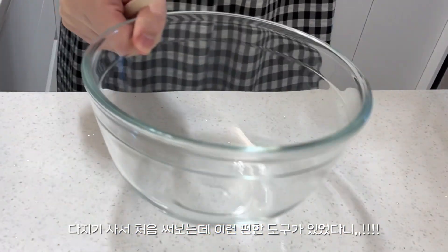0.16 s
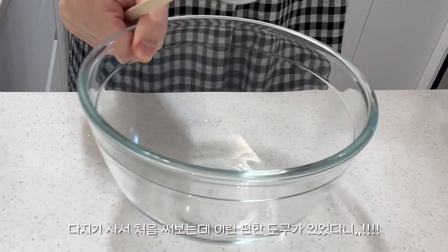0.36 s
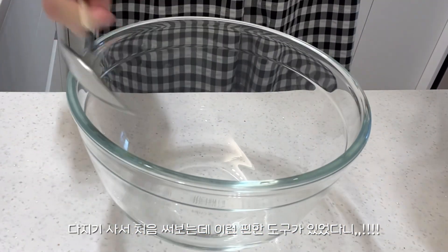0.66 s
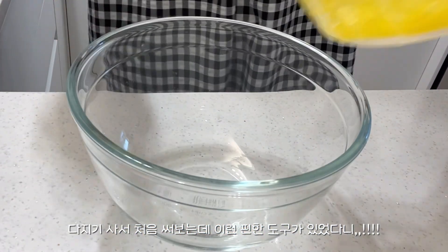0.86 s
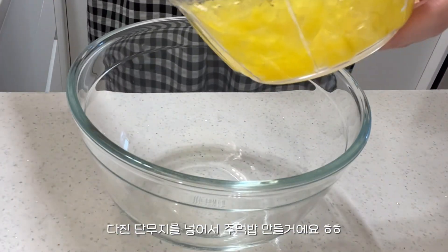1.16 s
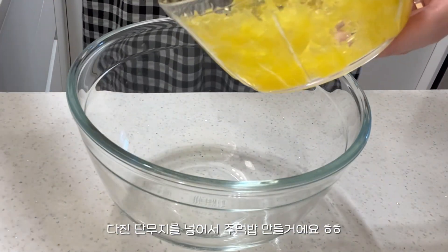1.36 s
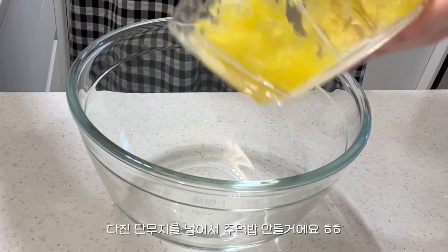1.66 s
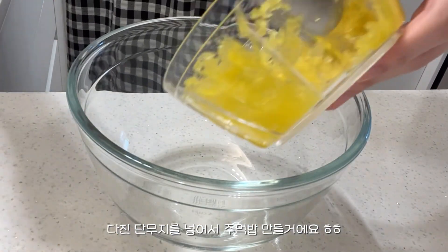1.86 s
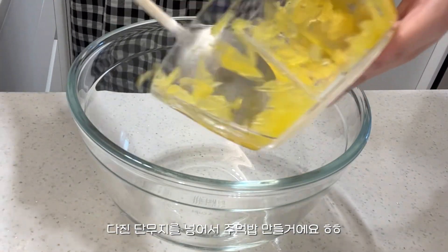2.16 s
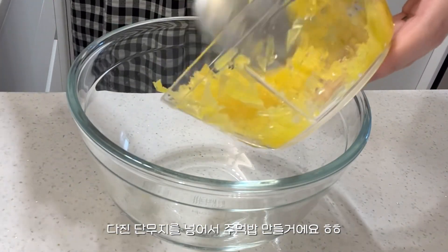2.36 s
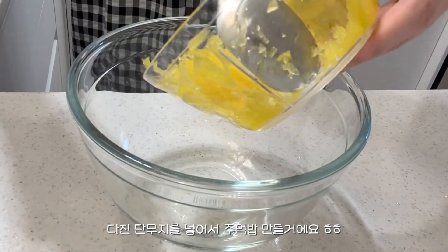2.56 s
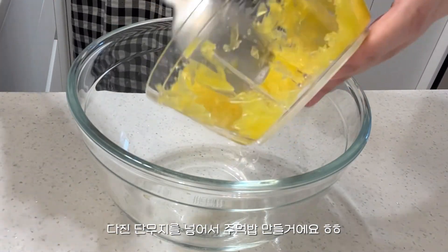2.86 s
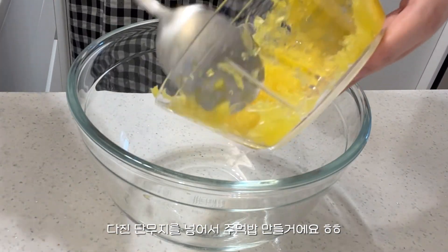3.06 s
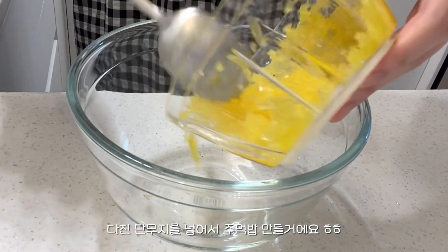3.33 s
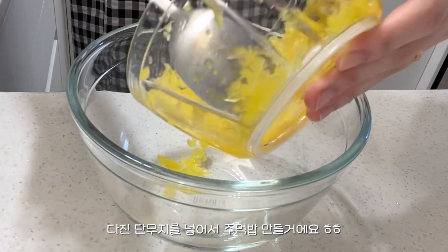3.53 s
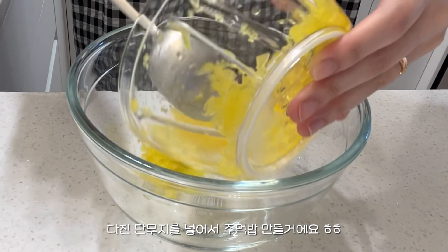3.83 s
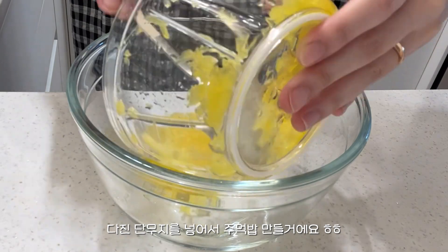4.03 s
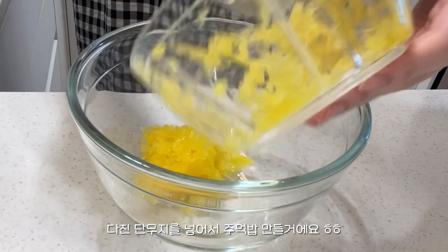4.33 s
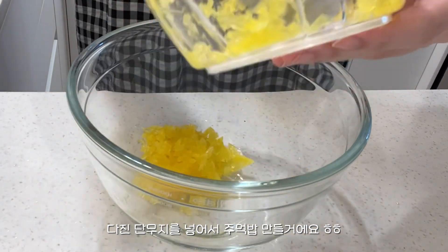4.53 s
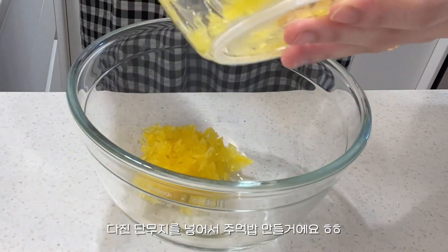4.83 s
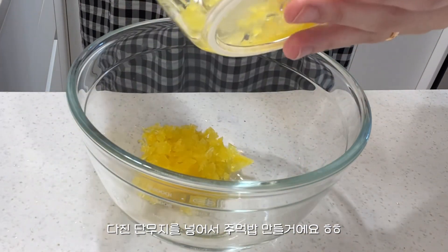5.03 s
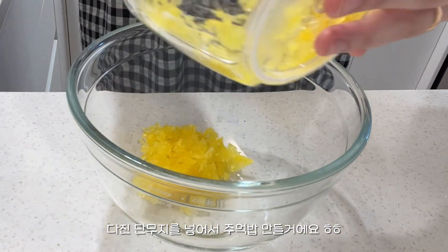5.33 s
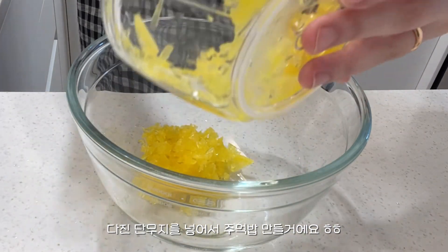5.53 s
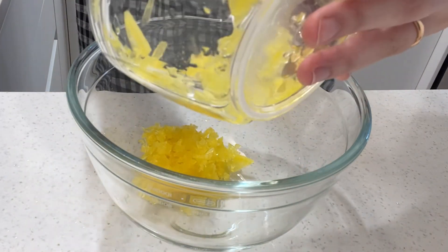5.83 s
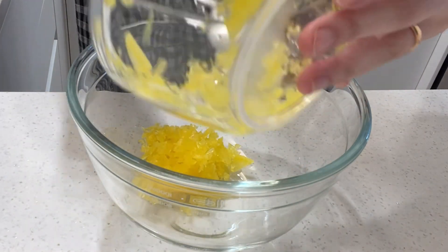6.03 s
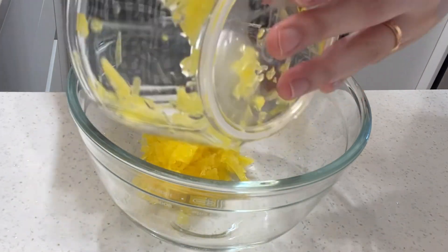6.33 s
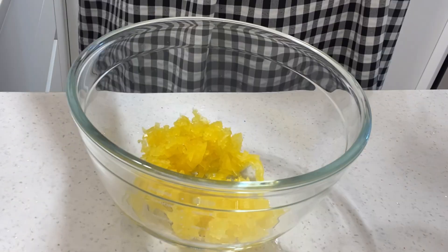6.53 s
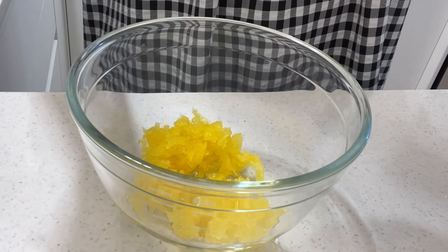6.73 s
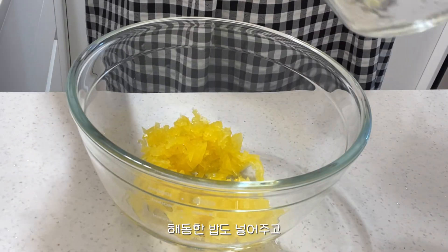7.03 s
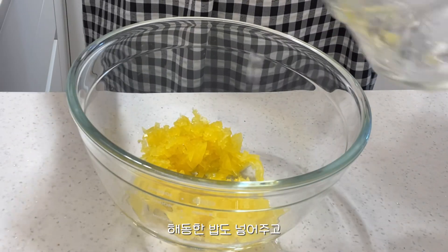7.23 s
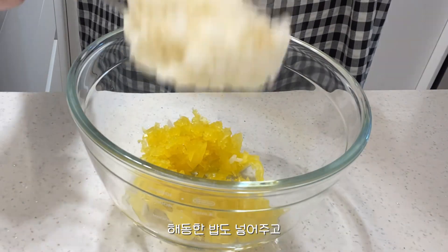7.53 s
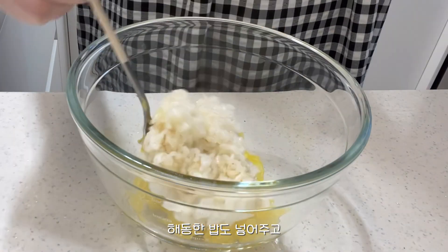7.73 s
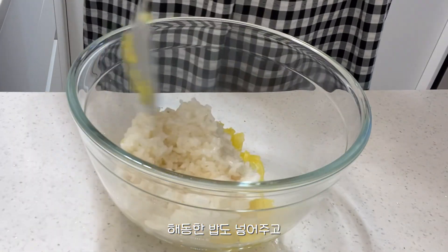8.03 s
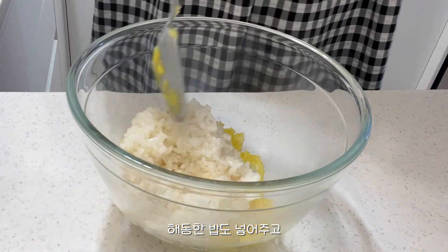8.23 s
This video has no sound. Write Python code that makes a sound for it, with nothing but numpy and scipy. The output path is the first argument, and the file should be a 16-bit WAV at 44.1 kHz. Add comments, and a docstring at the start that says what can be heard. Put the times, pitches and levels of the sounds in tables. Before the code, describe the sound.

Close stereo pickup of kitchen handling: low thuds as a heavy glass bowl lands, a short clear clink, then a pause. Spoon blows on a hand-held plastic container come singly and in tight clusters, bright cracks over a hollow pock around one kilohertz, with short wet rasps. After the final three taps with slight spoon ringing, only soft low hum and tiny ticks of rice remain. Short room reflections.

```python
"""A steel spoon knocks and scrapes a plastic cup of chopped pickle over a glass bowl: each blow is
noise bursts plus decaying wall and hollow modes, each scrape a filtered train of random slips.
The bowl is first set on a kitchen counter, whose slab booms; glass and spoon ring as modal sums.
A small hard room answers with decaying noise, over a low appliance hum of shaped noise;
a pair of close microphone ports hears it all, differing in phase and level."""
import sys
import numpy as np
from scipy import signal
from scipy.fft import rfft, irfft, next_fast_len
from scipy.io import wavfile
from scipy.ndimage import uniform_filter1d

SR = 44100
rng = np.random.default_rng(int(sys.argv[2]) if len(sys.argv) > 2 else 0)


def materialize(psi):
    """Save the field psi as 16-bit PCM at rate SR to the path in sys.argv[1].

    A 1-D psi becomes a single channel; in a 2-D psi each row is a channel.
    """
    bounded = np.clip(np.atleast_2d(psi).T, -1, 1)
    quanta = np.round(bounded * 32767).astype(np.int16)
    wavfile.write(sys.argv[1], SR, quanta)


N = 369999  # samples

# All levels are relative: room, ports and microphone filter follow.
# Appliance hum spectrum: pitch_hz [Hz], density_db [dB per Hz]
HUM_SPECTRUM = [(15, -30), (25, -13), (54, 3.5), (81, -2.5), (125, -8), (254, -12), (415, -22),
                (559, -17.5), (889, -19.5), (1030, -21.5), (1400, -32), (2200, -40.5), (5530, -48),
                (9280, -50), (11500, -56), (16900, -59)]
# Hum likeness of the two ports: pitch_hz [Hz], correlation [-1 to 1]
HUM_LIKENESS = [(60, 0.49), (170, 0.28), (345, 0.32), (520, -0.21), (1300, -0.44), (1700, -0.15),
                (6500, -0.18), (8600, .8), (12000, 0), (15000, .5)]
# Hum balance: pitch_hz [Hz], left_minus_right_db [dB]
HUM_BALANCE = [(60, 0), (170, -4), (345, -5), (700, -2), (1200, -2), (1600, 0)]
HUM_END_DB, HUM_EASES_DB = -66.5, 3.5  # rms level at the end; extra at the start, easing evenly

# Jolts that make the counter slab boom: start_s [s], level_db [dB]
JOLTS = [(0.071, -53), (0.196, -32.5), (0.319, -45), (0.468, -25.5), (0.601, -49.5), (0.73, -51),
         (1.579, -52.5), (2.142, -55.5), (2.679, -43.5), (3.118, -54.5), (3.52, -54), (4.171, -40.5),
         (4.51, -46), (5.311, -46), (5.701, -55.5), (6.33, -58)]
# Modes of the counter slab: pitch_hz [Hz], level_db [dB], t60_s [s]
COUNTER_MODES = [(60, -1.5, 0.27), (77, -2, 0.16), (132, -7, .15), (178, -8.5, 0.13), (237, -10.5, 0.16),
                 (366, -14.5, 0.29)]
# The bowl's foot meets the counter: start_s [s], knock_db [dB], clack_db [dB]
SETDOWNS = [(.197, -31.5, -64), (.320, -55.5, -62), (0.470, -27.5, -39)]

# Blows on the glass: spot [name], start_s [s], ring_db [dB], contact_db [dB]
GLASS_BLOWS = [("rim", .532, -32, -38.5), ("flank", 4.143, -41, -60), ("foot", 4.178, -45, -58)]
# Modes of the glass: pitch_hz [Hz], t60_s [s], then rim_db, flank_db, foot_db [dB] by spot struck
GLASS_MODES = [(657, .7, -24, -15, -16), (1646, 1.2, -35, -30, -30), (1651, .3, -35, -40, -40),
               (1663, .75, -48, -14, 0), (1970, .08, -14, -25, -25), (2982, .5, -24, -4, -1),
               (2988, .42, 0, -30, -30), (3500, .06, -14, -30, -30), (3817, .12, -18, -25, -25),
               (4560, .1, -14, -20, -30), (4640, .22, -17, -6, -12), (4760, .08, -10, -20, -30),
               (6638, .16, -25, -20, -34), (6977, .15, -24, -30, -30), (8113, .12, -28, -24, -36),
               (8930, .09, -20, -3, -34), (9480, .09, -26, -14, -36), (10400, .12, -32, -22, -38),
               (13100, .08, -34, -30, -44), (14300, .08, -34, -30, -44)]
# Blows that leave the spoon ringing: spot [name], start_s [s], ring_db [dB], contact_db [dB]
SPOON_BLOWS = [("edge", 6.439, -54.5, -62), ("back", 6.567, -38, -60), ("tip", 6.686, -43, -61)]
# Modes of the spoon: pitch_hz [Hz], t60_s [s], then edge_db, back_db, tip_db [dB] by spot struck
SPOON_MODES = [(1950, .2, 5, -20, -12), (2853, .17, 0, -14, -9), (4124, .23, -14, -16, 0),
               (4440, .13, -16, 0, -20), (5286, .17, -1, -12, -10), (6735, .25, -8, -3, -4),
               (7000, .25, -1, -14, -16), (7257, .2, -5, -12, -8), (7560, .13, -16, 0, -16),
               (8947, .2, -10, -10, -10), (9400, .18, -6, -14, -14), (11200, .16, -8, -18, -20)]

# Spoon on cup: landing_s [s], hollow_db [dB], hollow_pitch_hz [Hz], hollow_t60_s [s],
# load_slap_db [dB], wall_flex_db [dB], crack_db [dB], steel_edge_tick_db [dB]
KNOCKS = [(1.348, -34.5, 1048, .046, -67.5, -52.5, -45.5, -57.5),
          (1.493, -19.5, 1128, .047, -46, -34.5, -31, -30.5),
          (1.566, -56, 930, .084, -38.5, -54, -36, -41.5), (1.908, -51, 930, .029, -51, -82, -80, -83),
          (1.977, -52, 900, .046, -39, -66, -50.5, -55), (2.139, -58.5, 1030, .08, -45, -73, -59.5, -69),
          (2.446, -58, 940, .08, -48, -90, -81, -87), (2.526, -35, 917, .072, -55, -46, -40.5, -45),
          (2.572, -13.5, 1085, .056, -32, -23.5, -28, -35), (2.672, -18, 900, .027, -41, -25, -22, -24),
          (2.991, -30, 1007, .071, -57, -44.5, -45.5, -56),
          (3.413, -64, 1002, .067, -76.5, -67.5, -69.5, -83),
          (3.459, -23, 1053, .08, -54, -28.5, -34.5, -29), (3.509, -24, 1120, .08, -29, -28.5, -24, -29.5),
          (3.519, -23, 1064, .08, -40.5, -23.5, -34.5, -33), (3.659, -56, 986, 0.083, -57, -59, -59.5, -63),
          (4.025, -15.5, 1042, .045, -45, -26, -28, -33), (4.141, -24, 1150, .073, -47, -51, -39, -60),
          (4.148, -25, 1048, .037, -34, -38.5, -37.5, -61), (4.166, -33, 1153, .12, -54, -47, -61, -58),
          (4.515, -16.5, 932, .09, -31, -28, -22.5, -28.5), (4.613, -19, 951, .039, -35, -41.5, -22.5, -29),
          (4.69, -25, 971, .058, -44, -29, -24, -34), (4.786, -50, 1112, .032, -56, -50, -41, -54),
          (4.802, -17.5, 984, .1, -40, -27, -24, -27), (4.813, -20, 1000, .06, -46, -49, -49, -51),
          (5.164, -24.5, 1002, .072, -37, -26.5, -23, -27), (5.303, -17, 1011, .13, -38.5, -27, -17, -22),
          (5.558, -44, 1005, .08, -60, -56, -41.5, -55), (5.631, -20.5, 1042, .063, -33.5, -29.5, -23, -32),
          (5.697, -18.5, 1234, .08, -47, -18, -26, -30.5), (5.794, -34, 1048, .063, -64, -55, -75, -53.5),
          (5.825, -37.5, 941, .08, -71, -43.5, -48, -45), (5.981, -63.5, 1090, .08, -63, -65, -67.5, -62),
          (6.02, -50.5, 1030, .08, -70, -62, -57, -62.5), (6.072, -38, 1027, .085, -55, -72, -39, -57),
          (6.323, -32, 1154, .04, -46.5, -32, -38.5, -39.5), (6.339, -18, 1060, .047, -41, -26, -24, -37),
          (6.343, -25, 691, 0.048, -60, -50, -60, -60), (6.438, -56.5, 1072, .055, -54, -47, -70, -50),
          (6.567, -24.5, 1260, 0.035, -62.5, -41.5, -26, -27.5),
          (6.685, -26.5, 1053, 0.038, -60, -39, -26.5, -32.5)]
# Band centres of thump, hollow, clack, crack, tick and air: pitch_hz [Hz]
BLOW_BANDS_HZ = 280, 950, 1700, 4000, 9000, 14500
# Air hollow and low wall modes of the cup: pitch_hz [Hz], level_db [dB]
HOLLOW_MODES = [(660, 3), (710, -9), (790, -5), (925, -13), (950, 7), (1025, 2), (1060, 4.5), (1130, 1),
                (1190, -3), (1315, -7)]
# Stiff wall modes of the cup: pitch_hz [Hz]
WALL_MODES_HZ = [1380, 1460, 1670, 1787, 2270, 2647, 2850, 3240, 3766, 4440, 5010, 5890, 6290, 7800, 8400,
                 9050, 9480]
LEAD_IN_S, LEAD_IN_DB = .018, -25.5  # a soft noise swells up for this long before each blow; against the blow
CHATTER_S, SPREAD_S = .034, .003  # t60 of the rattle after a blow; spread of its contacts
AIR_DB = -2  # the very top against the tick

# Strokes of the spoon on wet plastic: middle_s [s], length_s [s], level_db [dB]
SCRAPES = [(1.719, .2, -72.5), (2.135, .09, -66.5), (2.26, .2, -77), (2.522, .02, -56), (2.695, 0.061, -42),
           (2.84, .2, -67.5), (3.01, 0.057, -61.5), (3.25, .12, -77), (3.8, .11, -78), (4.541, .05, -47.5),
           (5.292, .03, -43.5), (5.79, .06, -60), (6.045, .08, -63.5), (6.084, .055, -48),
           (6.425, .08, -57), (6.501, .2, -68), (7.72, .08, -90), (7.91, .18, -83)]
# Colour of the slips: pitch_hz [Hz], level_db [dB]
SLIDE_SPECTRUM = [(300, -27), (700, -4.5), (1000, 9.5), (1500, -4.5), (3000, -12.5), (4200, -3),
                  (6000, -10.5), (9000, -8), (15000, -13.5)]
STROKE_ENDS_DB = -16  # level half a length from the middle of a stroke
# Faint sticky ticks of rice and spoon: start_s [s], pitch_hz [Hz], click_db [dB], ping_db [dB]
TICKS = [(7.08, 10500, -67, -100), (7.152, 8500, -78, -100), (7.64, 10500, -68.5, -100),
         (7.657, 9500, -74, -95), (7.761, 1850, -76, -72), (7.841, 10000, -64, -100),
         (7.854, 3900, -70, -76), (7.858, 1800, -70, -78), (7.856, 6950, -80, -81), (7.89, 3850, -71, -78),
         (7.93, 2800, -71, -94), (7.895, 5150, -85, -84), (7.978, 8000, -78, -88)]

# Decay of the room: pitch_hz [Hz], t60_s [s]
ROOM_DECAY = [(60, .26), (200, 0.37), (530, .35), (1390, .29), (3680, 0.23), (9700, .26), (16000, .2)]
# Likeness of the room tail at the two ports: pitch_hz [Hz], correlation [0 to 1]
ROOM_LIKENESS = [(60, 0.8), (300, 0.92), (1000, 0.13), (3000, 0.11), (5000, .2), (6800, 0.15), (7600, 0.75),
                 (16000, 1)]
# Phase between the ports: pitch_hz [Hz], left_lead_rad [rad]
PORT_LEAD = [(30, 0), (170, -.6), (260, -1.8), (340, -2.0), (440, -3.4), (600, -3.8), (870, -6.1),
             (1050, -5.3), (1500, -7.6), (2000, -8.3), (2300, -7.4), (3000, -8.6), (4300, -7.9),
             (6000, -8.7), (8000, -6.3), (10000, -4.8), (12100, -3.14), (14000, -1.5), (16000, 0)]
# Level between the ports: pitch_hz [Hz], left_minus_right_db [dB]
PORT_BALANCE = [(60, 1), (130, -6), (290, -8), (640, 1.5), (1410, -3), (3100, 0), (6820, -1.5),
                (15000, 0.5)]
EDGE_HZ = 16950  # upper band limit


def gain_of(db):
    """Decibels are logarithmic: 20 dB make a factor of ten in amplitude."""
    return 10 ** (np.asarray(db) / 20)


def evened(x):
    """Equal mean power: scales to unit rms."""
    return x / np.sqrt(np.mean(x ** 2) + 1e-20)


def read(points, hz):
    """Logarithmic pitch scale: interpolates a table over log frequency."""
    f, value = np.transpose(points)
    return np.interp(np.log(hz + 1), np.log(f + 1), value)


def shaped(x, gain):
    """Linear filtering: multiplies the spectrum by a function of frequency."""
    size = next_fast_len(x.shape[-1] + 2048)
    spectrum = rfft(x, size) * gain(np.fft.rfftfreq(size, 1 / SR))
    return irfft(spectrum, size)[..., :x.shape[-1]]


def add(mix, s, sound):
    """Superposition: sums a sound into the mix from a time in seconds, cut at the mix's end."""
    part = mix[round(s * SR):][:len(sound)]
    part += sound[:len(part)]


def ring(hz, db, t60, rise=0.00042):
    """Modal decay: a sum of dying sines, neighbours starting in opposite directions."""
    t = np.arange(int(min(np.max(t60), 1) * SR)) / SR
    hz, db, t60 = (np.reshape(c, (-1, 1)) for c in (hz, db, np.maximum(t60, 1e-3)))
    sign = (-1) ** np.arange(len(hz))[:, None]
    modes = sign * gain_of(db - 60 * t / t60) * np.sin(2 * np.pi * hz * t)
    return modes.sum(0) * (1 - np.exp(-t / rise))


def contacts(spread, count=4):
    """Multiple impact: a blow lands at once and again in a few uneven contacts."""
    train = np.zeros(int(max(spread, 1e-4) * SR) + 2)
    at, size = rng.random(count), rng.exponential(1, count)
    np.add.at(train, (at * (len(train) - 1)).astype(int), size)
    train[0] += 1.4
    return train / train.sum()


def burst(points, t60, train=np.ones(1), size=4096):
    """Impact noise: a dying puff at each contact, its spectrum tabled in level per octave."""
    hz, t = np.fft.rfftfreq(size, 1 / SR), np.arange(size) / SR
    octave_even = rfft(rng.standard_normal(size)) * np.sqrt(SR / 2 / (hz + 30))
    puff = gain_of(-60 * t / t60) * (1 - np.exp(-t / 0.00017))
    envelope = np.convolve(puff, train)[:size]
    return irfft(octave_even * gain_of(read(points, hz)), size) * abs(envelope)


def hum():
    """Stationary broadband noise: mostly low, partly correlated at the ports, swelling a little."""
    frames, hz = N // 512 + 5, np.fft.rfftfreq(2048, 1 / SR)
    a, b, c, d, patches = rng.standard_normal((frames, 1025, 5)).T
    # small random swells, smoothed over frequency and then over time
    patches = evened(uniform_filter1d(uniform_filter1d(patches, 20, 0), 10, 1))
    same = np.clip(read(HUM_LIKENESS, hz), -1, 1)[:, None]
    left = a + 1j * b
    right = same * left + np.sqrt(1 - same ** 2) * (c + 1j * d)
    balance_db = np.outer([.5, -.5], read(HUM_BALANCE, hz))[..., None]
    level_db = read(HUM_SPECTRUM, hz)[:, None] + 1.3 * patches + balance_db
    z = np.array([left, right]) * gain_of(level_db)
    noise = signal.istft(z, nperseg=2048, noverlap=1536)[1][:, :N]
    easing_db = HUM_EASES_DB * (1 - np.arange(N) / N)
    return gain_of(HUM_END_DB + easing_db) * evened(noise)


def boom(db):
    """Plate resonance: the counter slab's low modes rise slowly and die away."""
    f, level_db, t60 = np.transpose(COUNTER_MODES)
    return ring(f, db + level_db, t60, rise=0.01)


def setdown(knock_db, clack_db):
    """Multiple impact: the bowl's foot rolls down in a few contacts and gives a dull knock."""
    colour = [(100, knock_db - 15), (300, knock_db - 0.5), (550, knock_db + 2), (900, knock_db),
              (2500, clack_db), (5000, clack_db - 19.5), (12000, clack_db - 30.5)]
    return burst(colour, 0.058, contacts(0.0044))


def struck(modes, spot, db, contact_db, split):
    """Modal excitation: a hard body clicks and rings by the spot struck, in close mode pairs."""
    f, t60, *level_db = np.transpose(modes)
    out = ring(f, db + level_db[spot], t60)
    twin = f * (1 + split * rng.uniform(-0.99, 1, len(f)))  # weaker and shorter
    add(out, 0, ring(twin, db + level_db[spot] - 7.5, .6 * t60))
    click = [(500, contact_db - 20), (2000, contact_db - 3), (4500, contact_db), (14000, contact_db - 12)]
    add(out, 0, burst(click, .06))
    return out


def knock(hollow_db, hz, sustain, thump_db, clack_db, crack_db, tick_db):
    """Impact and resonance: a soft noise lead-in and a blow that wakes wall and hollow modes near hz."""
    air_db = tick_db + AIR_DB
    levels_db = thump_db, hollow_db - 3.5, clack_db, crack_db, tick_db, air_db
    colour = list(zip(BLOW_BANDS_HZ, levels_db))
    noise = [(60, thump_db - 20.5)] + colour + [(15900, air_db - 3), (16600, air_db - 20)]
    chatter = burst(noise, CHATTER_S)
    snap = gain_of(6) * burst(noise, 0.0071, contacts(SPREAD_S))
    blow = chatter + snap

    f = np.array(WALL_MODES_HZ)
    spot_db = 3.2 * rng.standard_normal(len(f))  # each spot struck favours other modes
    add(blow, 0, ring(f, read(colour, f) - 10 + spot_db, .035 * (3000 / f) ** .5))

    f, db = np.transpose(HOLLOW_MODES)
    near = gain_of(db - 300 * np.log2(f / hz) ** 2)  # the grip and the angle pick a few neighbours
    share_db = 20 * np.log10(near / near.sum() + 1e-6)
    add(blow, 0, ring(f, hollow_db + share_db + 6, np.full(len(f), sustain), rise=0.0018))

    thump_hz = 290 * rng.uniform(.9, 1.1)  # the wet load slaps the cup's bottom
    add(blow, 0, ring([thump_hz], [thump_db + 0.19], [.05], rise=0.00076))
    # a decay reversed swells up to the blow
    lead_in = gain_of(LEAD_IN_DB) * burst(noise, 0.037)[:round(LEAD_IN_S * SR)][::-1]
    return np.concatenate([lead_in, blow])


def scrape(middle, length, db):
    """Frictional slip noise: dense uneven slips under a stroke that swells and sinks."""
    t = np.arange(-.7 * length, .7 * length, 1 / SR)  # runs a little past the nominal length
    slips = rng.standard_normal(len(t)) * gain_of(2.5 * rng.exponential(1, len(t)))
    slips *= rng.random(len(t)) < .2  # about one sample in five slips
    rasp = evened(shaped(slips, lambda hz: gain_of(read(SLIDE_SPECTRUM, hz))))
    swell_db = db + STROKE_ENDS_DB * abs(2 * t / length)
    return middle + t[0], rasp * gain_of(swell_db)


def tick(hz, db, ping_db):
    """Band-limited impact: a short puff around one pitch with a small ping of two modes."""
    out = burst([(hz / 3, db - 22), (hz, db), (hz * 2.2, db - 12)], .01, contacts(SPREAD_S))
    add(out, 0, ring([hz, hz * 0.89], [ping_db, ping_db - 5], [.09, .06]))
    return out


def tail():
    """Diffuse reverberation: dense noise, each band with its own decay, partly alike at the ports."""
    t = np.arange(SR // 2) / SR
    onset = np.clip((t - .0015) / 0.00086, 0, 1)
    noise = rng.standard_normal((2, SR // 2)) * onset
    hz, t, (a, b) = signal.stft(noise, SR, nperseg=256)
    same = np.clip(read(ROOM_LIKENESS, hz), 0, 1)[:, None]
    z = np.array([a, same * a + np.sqrt(1 - same ** 2) * b])
    late = gain_of(-60 * t / read(ROOM_DECAY, hz)[:, None])
    early = gain_of(5 - 60 * t / .03)  # counter and bowl answer early
    out = signal.istft(z * (late + early), SR, nperseg=256)[1]
    return out / np.linalg.norm(out[0])


def kitchen(x):
    """Diffuse reverberation: two noise tails take turns steadily, so no single tail colours every blow."""
    turn = 2 * np.pi * 1.7 * np.arange(N) / SR  # 1.7 turns a second
    weights = np.sin(turn), np.cos(turn)
    return sum(signal.oaconvolve((x * w)[None], tail(), axes=1)[:, :N] for w in weights)


def ports(x):
    """Interaural-style differences: the two ports differ in phase and level by frequency."""
    left = shaped(x[0], lambda hz: gain_of(read(PORT_BALANCE, hz) / 2) * np.exp(1j * read(PORT_LEAD, hz)))
    right = shaped(x[1], lambda hz: gain_of(-read(PORT_BALANCE, hz) / 2))
    return np.array([left, right])


def scene():
    """Direct and reverberant fields: blows sound in the kitchen, long rings mostly direct, over the hum."""
    near, ringing = np.zeros((2, N))
    for start_s, level_db in JOLTS:
        add(ringing, start_s, boom(level_db))
    for start_s, *row in SETDOWNS:
        add(near, start_s, setdown(*row))
    for spot, start_s, *row in GLASS_BLOWS:
        place = ("rim", "flank", "foot").index(spot)
        add(ringing, start_s, struck(GLASS_MODES, place, *row, split=.001))
    for landing_s, *row in KNOCKS:
        add(near, landing_s - LEAD_IN_S, knock(*row))
    for row in SCRAPES:
        add(near, *scrape(*row))
    for spot, start_s, *row in SPOON_BLOWS:
        place = ("edge", "back", "tip").index(spot)
        add(ringing, start_s, struck(SPOON_MODES, place, *row, split=.015))
    for start_s, *row in TICKS:
        add(near, start_s, tick(*row))
    direct = near + ringing
    reverberant = gain_of(-5.5) * kitchen(near + .4 * ringing)
    return ports(direct + reverberant) + hum()


def record(dry):
    """Band limitation: the microphone drops the deepest bass, then a steep low-pass ends the treble."""
    lean = signal.sosfilt(signal.butter(4, 42, "high", fs=SR, output="sos"), dry)
    low_pass = signal.firwin(511, EDGE_HZ, window=("kaiser", 9), fs=SR)
    return signal.oaconvolve(lean, low_pass[None], "same")


dry = scene()
out = record(dry)
materialize(out)
```